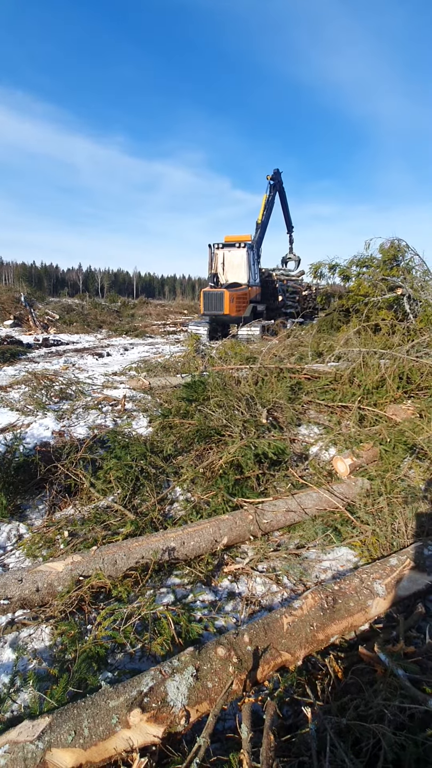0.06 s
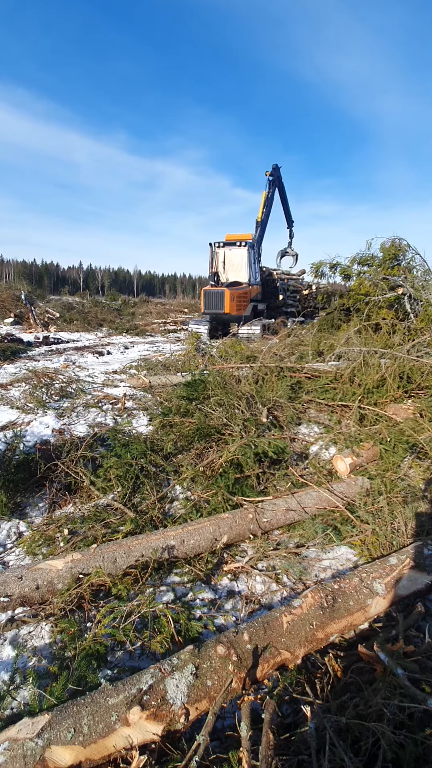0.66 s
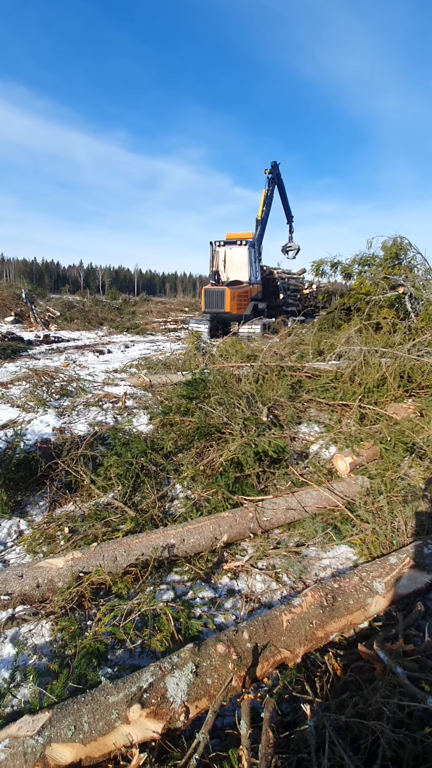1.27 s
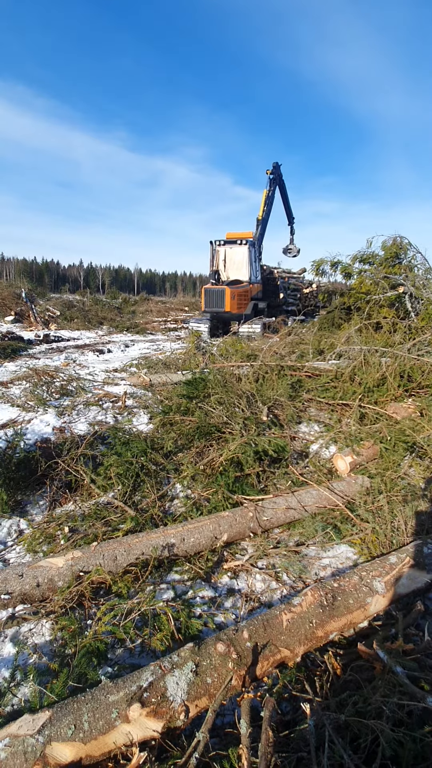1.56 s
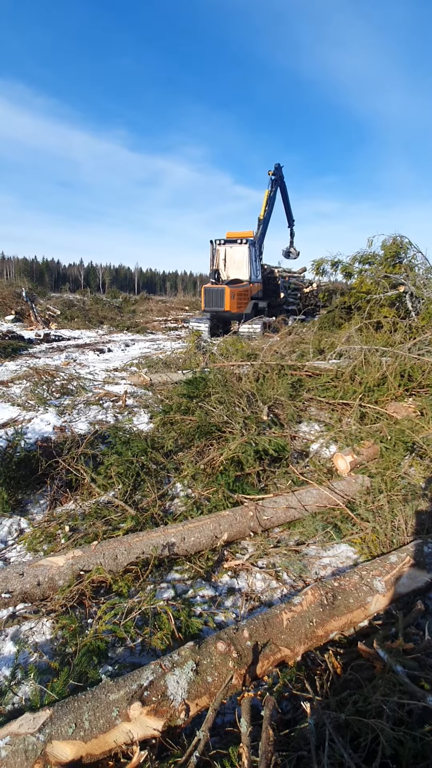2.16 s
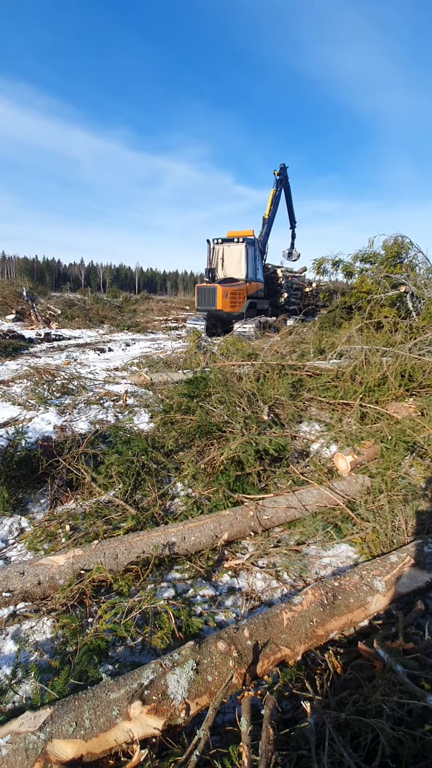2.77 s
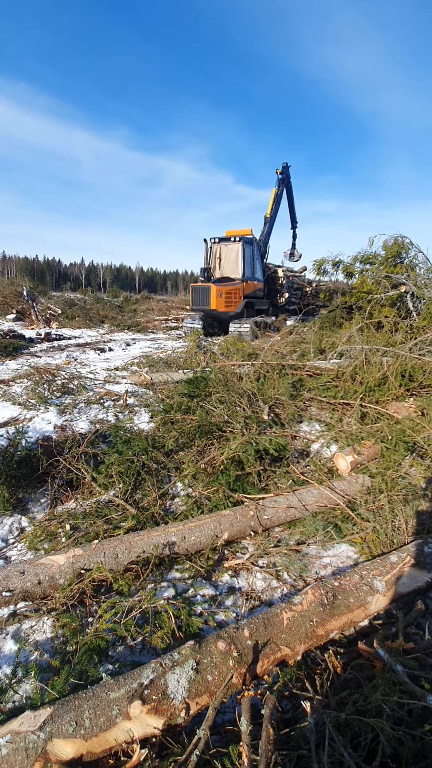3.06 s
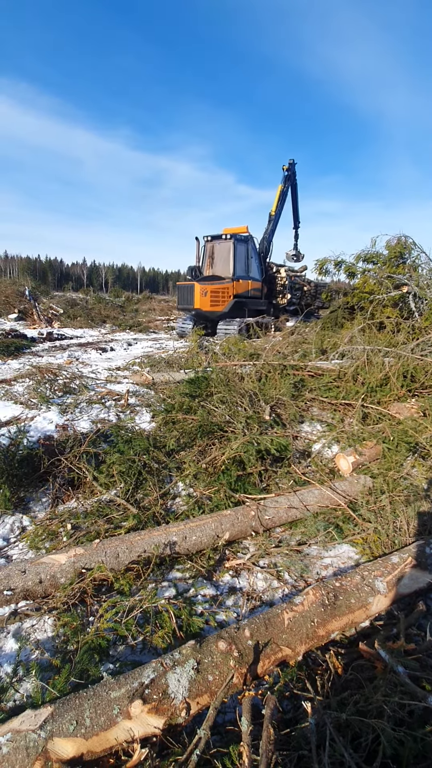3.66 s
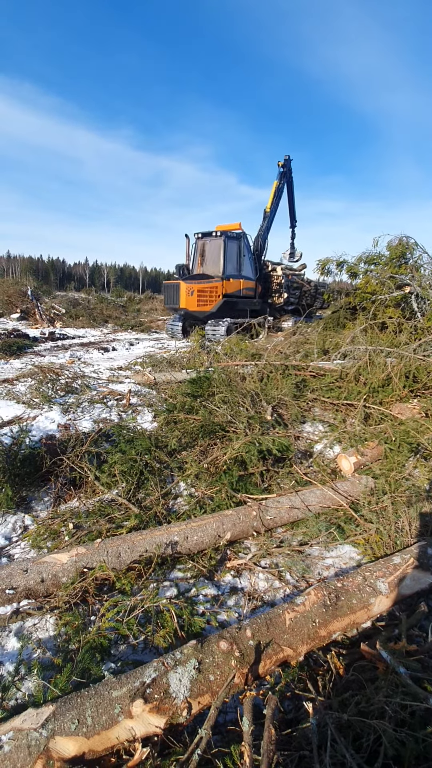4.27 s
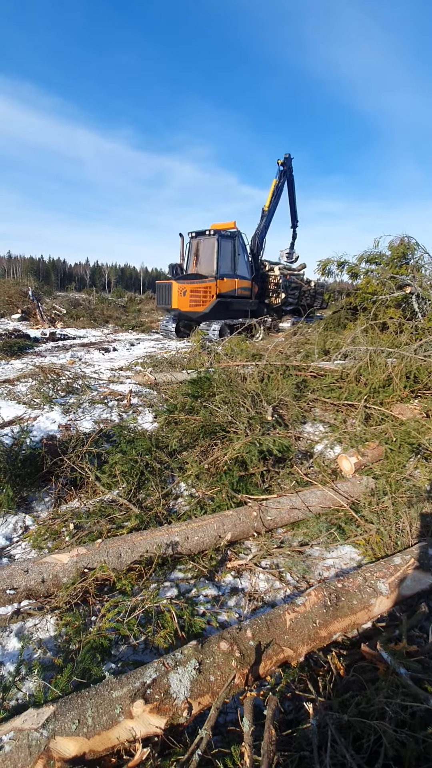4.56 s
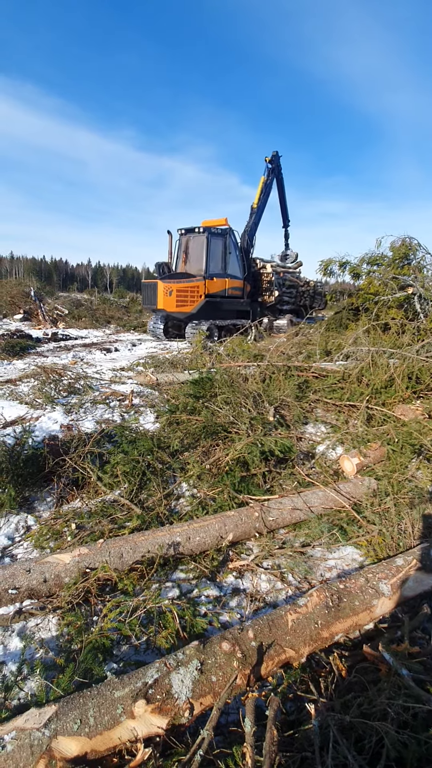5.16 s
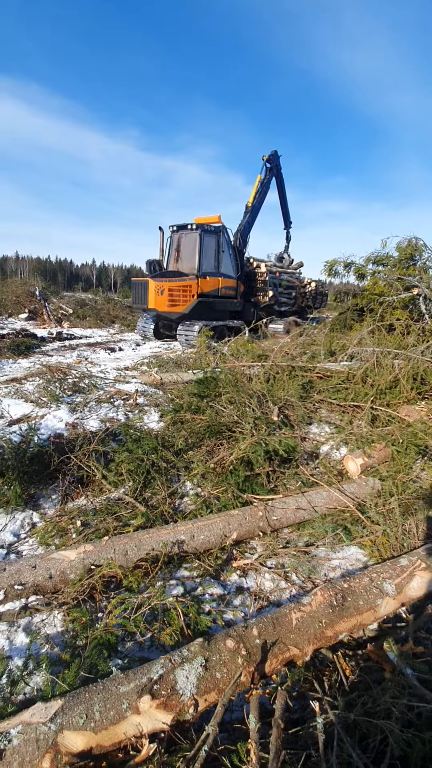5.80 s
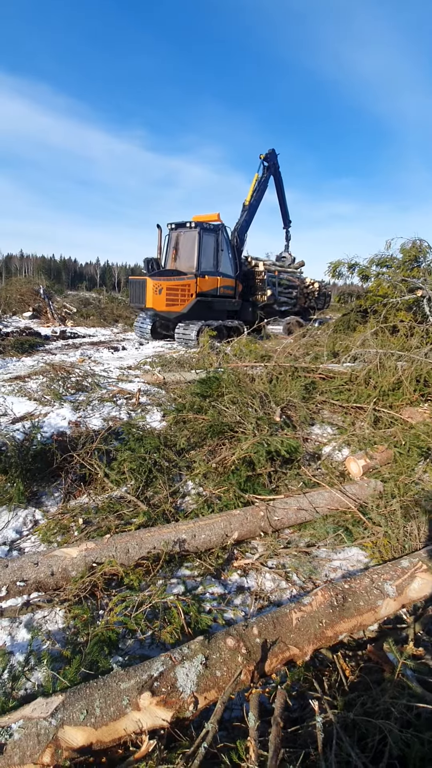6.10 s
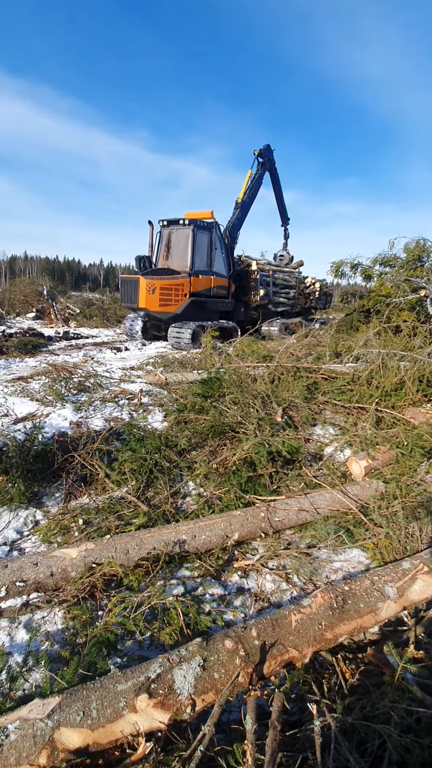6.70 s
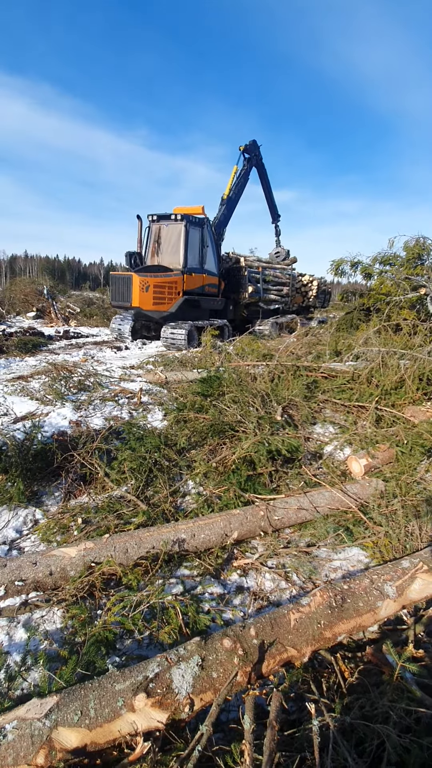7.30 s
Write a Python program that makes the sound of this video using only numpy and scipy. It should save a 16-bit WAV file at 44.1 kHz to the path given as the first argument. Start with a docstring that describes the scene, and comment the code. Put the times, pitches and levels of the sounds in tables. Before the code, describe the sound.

A tracked forestry machine's diesel surges, its steel grapple clacks shut, then it revs and drives closer over crackling twigs, tracks squeaking.

```python
"""A tracked forestry machine stands on a clear-cut, its four-cylinder diesel surging as it gets fuel.
Each firing booms and rasps in the exhaust, knocks the block and rattles the housing; a hydraulic pump
whines and the turbo whistles faintly. The crane's steel grapple clinks, then clacks shut at 1.6 s.
From 2.3 s the machine revs and drives closer over crackling twigs. After 5 s its turning tracks
scrape and squeak, and a brief squeal comes at the end."""
import sys
import numpy as np
from scipy import signal
from scipy.fft import rfft, irfft, next_fast_len
from scipy.io import wavfile
from scipy.ndimage import map_coordinates

SR = 44100
rng = np.random.default_rng(int(sys.argv[2]) if len(sys.argv) > 2 else 0)


def to_wav(sig):
    """Store sig (one row per channel, or 1-D mono) as 16-bit WAV at the path in sys.argv[1].

    Samples outside -1..1 are clipped; the rate is SR.
    """
    pcm = np.clip(np.atleast_2d(sig), -1, 1) * 32767
    pcm = np.round(pcm).astype(np.int16)
    wavfile.write(sys.argv[1], SR, pcm.T)  # frames by channels


N = 323694

# How strongly each of the four cylinders fires: level_db
CYLINDERS_DB = [-2.5, 0.5, -2, -5]
DRIVE_OFF_S, RISE_S = 2.316, 0.19  # when the tracks start; how long a pull takes to build up


def amp(db):
    """Turn decibels into a gain."""
    return 10 ** (np.asarray(db) / 20)


def unit(x):
    """Scale a signal to an average (rms) level of 1."""
    return x / np.sqrt(np.mean(x ** 2) + 1e-20)


def along(points, hz):
    """Read a (pitch_hz, value) table at hz, on a log frequency scale."""
    pitches, values = np.transpose(points)
    return np.interp(np.log(hz + 1), np.log(pitches + 1), values)


def curves(rows):
    """Turn each column after the time into one value per sample."""
    times, *columns = np.transpose(rows)
    return [np.interp(np.arange(N) / SR, times, column) for column in columns]


def wobble(rate):
    """A smooth random curve through `rate` points a second."""
    return map_coordinates(rng.standard_normal(int(N * rate / SR) + 4), [np.arange(N) * rate / SR])


def ramp(start_s, length_s):
    """A smooth step from 0 to 1."""
    return np.sin(np.pi / 2 * np.clip((np.arange(N) / SR - start_s) / length_s, 0, 1)) ** 2


def swell(centre_s, half_width_s):
    """A smooth bump of height 1."""
    return np.exp(-((np.arange(N) / SR - centre_s) / half_width_s) ** 2)


def wavering(hz, flutter_hz, rate):
    """The phase of a tone whose pitch wanders around hz."""
    return 2 * np.pi * np.cumsum(hz + flutter_hz * wobble(rate)) / SR


def filtered(x, response):
    """Filter x; response(hz) gives the gain and phase at each frequency."""
    size = next_fast_len(N + SR // 2)
    return irfft(rfft(x, size) * response(np.fft.rfftfreq(size, 1 / SR)), size)[..., :N]


def coloured(x, spectrum, ripple_db=0):
    """Shape x with a (pitch_hz, level_db) table, plus narrow random peaks and dips."""
    grid = np.arange(0, SR / 2, 110)
    ripple = rng.uniform(-1, 1, len(grid))
    peaks_db = lambda hz: ripple_db * np.interp(hz, grid, ripple) * hz / (hz + 1000)
    return filtered(x, lambda hz: amp(along(spectrum, hz) + peaks_db(hz)))


def resonate(x, centre_hz, width_hz):
    """Ring x through a steep resonance whose pitch moves."""
    carrier = np.exp(2j * np.pi * np.cumsum(centre_hz) / SR)
    shifted = x / carrier
    for width in (width_hz, 2 * width_hz):
        shifted = signal.lfilter([1], [1, -np.exp(-np.pi * width / SR)], shifted)
    return unit((shifted * carrier).real)


def spread(pair):
    """Mix two unrelated signals to left and right: alike in the bass, scattered in the treble."""
    # How alike the two sides are: pitch_hz, likeness
    likeness = [(200, 1), (600, .98), (1100, .86), (1700, .6), (2400, .45), (4400, .45), (9000, .3)]
    turn = lambda hz: np.arccos(np.clip(along(likeness, hz), -1, 1)) / 2
    mid, side = filtered(pair, lambda hz: np.array([np.cos(turn(hz)), np.sin(turn(hz))]))
    return np.array([mid + side, mid - side])


def bursts(firings, repeat, early, decay, between, scatter_db, uneven=1):
    """One noise burst per firing over steady noise (`between`); early and decay count in firings."""
    turns = firings + early + 1
    index, age = turns.astype(int), turns % 1
    cycle = rng.standard_normal((2, 3400))  # this noise repeats every four firings
    same = cycle[:, (turns / 4 % 1 * cycle.shape[1]).astype(int)]
    noise = np.sqrt(repeat) * same + np.sqrt(1 - repeat) * rng.standard_normal((2, N))
    cylinder_db = uneven * np.take(CYLINDERS_DB, index, mode="wrap")
    size = amp(cylinder_db + scatter_db * rng.standard_normal(SR)[index])
    return noise * (between + size * (1 - np.exp(-age / 0.11)) * np.exp(-age / decay))


def over_ground(x):
    """Sound bouncing off the ground cancels one band, which rises as the machine comes closer."""
    # The cancelled band: time_s, pitch_hz, depth_db, half_width_hz
    ground_dip = [(0, 241, -1.5, 30), (2.6, 254, 2.5, 43.4), (3.5, 322, 12, 64.6), (4.1, 354, 9, 35.2),
                  (6.2, 362, 10, 31.8), (7.34, 365, 5, 28)]
    hz, frame_s, spectra = signal.stft(x, SR, nperseg=4096)
    times, *columns = np.transpose(ground_dip)
    dip_hz, depth_db, half_width_hz = [np.interp(frame_s, times, column) for column in columns]
    gain = amp(-depth_db * np.exp(-((hz[:, None] - dip_hz) / half_width_hz) ** 2))
    return signal.istft(spectra * gain, SR, nperseg=4096)[1][:, :N]


def turbo():
    """A breathy whistle that swoops as the turbo spins up after each surge of fuel."""
    # The main whistle: time_s, pitch_hz
    glide = [(0, 10650), (.13, 10800), (.28, 12100), (.5, 12650), (.72, 11750), (1.1, 11250), (1.3, 11650),
             (1.45, 12650), (1.62, 12700), (1.82, 13700), (2.0, 12600), (2.15, 12000), (2.32, 11850),
             (2.7, 15000), (3.15, 17600), (3.65, 20200), (3.9, 18400), (4.3, 17200), (4.7, 16200),
             (7.34, 15200)]
    # Its tones: pitch_multiple, level_db, flutter_hz
    whistles = [(1, -67, 210), (.6, -68, 260)]
    # What escapes the air intake: pitch_hz, level_db
    intake = [(8400, -16), (9100, -5), (9800, -3), (10600, 0), (12600, 0), (13400, -5), (15000, -4)]
    pitch_hz, = curves(glide)
    tones = sum(amp(db) * np.sin(wavering(multiple * pitch_hz, flutter_hz, rate=900))
                for multiple, db, flutter_hz in whistles)
    return coloured(amp(2.5 * wobble(60) + wobble(6)) * tones, intake)


def twigs():
    """Crushed brushwood gives tiny snaps, in flurries and steadily under the moving tracks."""
    # Flurries of snaps: time_s, half_width_s, level_db
    flurries = [(.15, 0.1, -53), (1.35, .05, -58), (2.525, .012, -46), (2.63, 0.08, -49.5),
                (2.83, 0.067, -53), (3.14, .015, -48), (3.55, .15, -56)]
    snaps_per_s, fade_s = 190, 0.0028
    level = amp(-65) * ramp(DRIVE_OFF_S, RISE_S)
    level += sum(amp(db) * swell(s, width) for s, width, db in flurries)
    snaps = (rng.random(N) < snaps_per_s / SR) * amp(rng.uniform(-15, 8.9, N))
    grains = signal.lfilter([1], [1, -np.exp(-1 / (fade_s * SR))], snaps) * rng.standard_normal((2, N))
    return level * spread(unit(coloured(grains, [(800, -10), (2200, 6), (6000, 1), (15000, 3)])))


def track_scrape():
    """The turning steel tracks scrape a rough, wandering note, with short squeaks above it."""
    # The scraping note: time_s, pitch_hz, level_db
    scrape = [(5.3, 1190, -75), (5.53, 1238, -50), (5.66, 1385, -36), (5.79, 1230, -43), (6.0, 1578, -49),
              (6.6, 1623, -38), (6.9, 1610, -75)]
    # The squeaks: time_s, pitch_hz, level_db
    squeaks = [(5.665, 4750, -49), (5.72, 4060, -43), (5.77, 4600, -48), (5.80, 2470, -44),
               (5.88, 2570, -50), (5.935, 2920, -44)]
    pitch_hz, level_db = curves(scrape)
    angle = wavering(pitch_hz, flutter_hz=70, rate=400)
    note = np.sin(angle) + .25 * np.sin(2 * angle) + 0.1 * np.sin(3 * angle)
    out = amp(level_db + 2 * wobble(80)) * note
    for s, hz, db in squeaks:
        out += amp(db) * swell(s, half_width_s=.022) * np.sin(wavering(hz, flutter_hz=28, rate=300))
    return out


def squeal():
    """One brief, slightly shaky high note."""
    # The note: time_s, pitch_hz, level_db
    note = [(6.8, 1010, -70), (7.05, 1000, -38), (7.15, 1008, -28), (7.22, 1021, -26), (7.34, 997, -55)]
    pitch_hz, level_db = curves(note)
    return amp(level_db + 2.03 * wobble(30)) * np.sin(wavering(pitch_hz, flutter_hz=10, rate=60))


def pump(firings):
    """The hydraulic pump is geared to the crank, so its whine throbs with the uneven turning."""
    # How loud it whines: time_s, level_db
    levels = [(0, -36), (2.4, -58), (3.55, -43), (3.92, -32.5), (4.2, -46), (5.3, -37), (6.2, -31.5),
              (7.34, -35)]
    level_db, = curves(levels)
    strokes = 2 * np.pi * 13.5 * firings + .45 * wobble(25)
    throb = 1 + .4 * np.cos(np.pi * firings)
    return amp(level_db + 2.5 * wobble(25)) * throb * np.sin(strokes)


def grapple():
    """Steel jaws meet and bounce: each contact is a hard tick, a gritty rattle and a ring."""
    # Contacts (a fade is a 60 dB drop): start_s, grit_db, fade_s, ring_db, brightness_db_per_octave
    contacts = [(.407, -31, .11, -45, 1), (.442, -32, .11, -42, 5), (.555, -42, .06, -49, 5.5),
                (1.5525, -12.5, .05, -25, 0), (1.559, -17, .05, -18.5, -1),
                (1.5735, -16, 0.055, -19.5, -1.5), (1.578, -23, 0.082, -28, 1.5),
                (1.587, -24, 0.035, -32, 5.5), (1.5935, -29, .05, -17.5, -7)]
    # The notes the jaws ring with: pitch_hz, level_db, fade_s
    jaw_notes = [(525, -6, .07), (638, 0, .07), (673, -1, .11), (830, -3, .05), (1057, -2, .08),
                 (1475, -6, .07), (1930, -7, .045), (2056, -10, .06), (2406, -12, .055), (3000, -15, .07),
                 (3989, -11, .05), (4940, -11.5, .055), (7047, -21, .05)]
    # The colour of the grit: pitch_hz, level_db
    grit_colour = [(250, -41), (500, 9), (900, -2.5), (2200, -2), (3500, -8.5), (6000, -16.5), (9500, -19),
                   (15000, -31)]
    tick_db, tick_fade_s = -6, 0.0096  # the tick's level is relative to the grit
    t = np.arange(SR // 4) / SR
    grit, rings = np.zeros(N), np.zeros(N)
    for start_s, grit_db, fade_s, ring_db, brightness in contacts:
        start = round(start_s * SR)
        span = slice(start, start + len(t))
        grit[span] += amp(grit_db - 60 * t / fade_s) + amp(grit_db + tick_db - 60 * t / tick_fade_s)
        for hz, db, ring_s in jaw_notes:
            note_db = ring_db + db + brightness * np.log2(hz / jaw_notes[0][0]) + rng.normal(0, 1)
            rings[span] += amp(note_db - 60 * t / ring_s) * np.sin(2 * np.pi * hz * t)
    rings = filtered(rings, lambda hz: hz ** 4 / (hz ** 4 + 430 ** 4))  # narrow jaws give little bass
    grain = rng.standard_normal((2, N)) * amp(2.5 * wobble(900))
    return spread(grit * unit(coloured(grain, grit_colour, ripple_db=4))) + rings


def governor():
    """The engine's fuel supply, as a share of full load: idle, travel, surges and brief cuts."""
    # More fuel when crane or tracks pull: start_s, length_s, extra_share
    surges = [(-.08, 0.31, 0.51), (0.243, 0.24, 0.41), (1.075, 0.63, 0.22), (1.161, 0.23, 0.29),
              (1.602, 0.18, 0.41), (2.187, 1.4, 0.4), (2.847, 0.43, 0.11), (3.9, 1.27, 0.073),
              (5.996, 0.42, 0.092), (6.734, 0.37, 0.14)]
    # Less fuel after the engine runs too fast: time_s, share_cut
    cuts = [(.66, 0.9), (1.945, 0.99), (3.85, 0.19)]
    idle, travel, fall_s = 0.26, 0.34, 0.16
    fuel = idle + travel * ramp(DRIVE_OFF_S, RISE_S)
    for start_s, length_s, extra in surges:
        fuel += extra * ramp(start_s, RISE_S) * (1 - ramp(start_s + length_s, fall_s))
    for s, share in cuts:
        fuel *= 1 - share * swell(s, half_width_s=0.066)
    return fuel


def block_knock(firings, load_db):
    """A short, hard burst at each firing rings the engine block, much louder under load."""
    # The block's resonances: pitch_hz, width_hz, level_db
    notes = [(830, 76, 2), (1650, 170, 0), (2000, 150, 5), (2200, 110, -1), (2820, 70, -8),
             (3300, 100, -4.5), (3900, 160, -6.5), (4930, 140, -16.5)]
    def block(hz):
        return sum((-1) ** k * amp(db) * 1j * hz * width / (centre ** 2 - hz ** 2 + 1j * hz * width)
                   for k, (centre, width, db) in enumerate(notes))
    blows = bursts(firings, repeat=0.41, early=-.04, decay=0.08, between=0.08, scatter_db=5)
    return spread(amp(-41.5 + 1.9 * load_db) * unit(filtered(blows, block)))


def housing(firings, load_db):
    """The firings rattle the panels, hardest under load, over the rush of cooling air."""
    # The rattle's colour from three sides of the machine: pitch_hz, level_db
    standing = [(110, 18), (260, 14.5), (400, 16.5), (600, 14), (820, 16), (930, 12), (1080, 15.5),
                (1250, 8.5), (1510, 8), (1640, 9.5), (1810, 1.5), (1920, 2), (2020, 1), (2170, -2),
                (2280, 2.5), (2670, 1), (2910, -5), (3230, 0), (3380, -5.5), (4110, -4.5), (4350, -8),
                (4930, -11.5), (5080, -11), (5230, -12), (5530, -14.5), (6890, -18), (7400, -45)]
    driving = [(250, -13), (350, 8), (820, 8), (1050, 9), (1250, 5), (1400, 3.5), (1530, 2), (1640, 8.5),
               (1770, 4.5), (2300, -3.5), (2650, -6.5), (2840, -8), (3170, -5), (3380, -2.5), (3640, -10),
               (4050, -3), (4390, -15.5), (4650, -5.5), (4930, -14.5), (5100, -12), (6270, -17.5),
               (6610, -23), (6890, -17.5), (7400, -32)]
    nearing = [(230, 9.5), (300, 15.5), (355, 0), (820, 2), (1150, 7.5), (1330, -3), (1640, 7),
               (1830, -1.5), (2000, 4.5), (2220, 3.5), (2440, -8.5), (2830, 2), (3060, -9), (3420, -1.5),
               (3770, -8.5), (4330, -2.5), (4870, -11), (5790, -13.5), (6140, -19), (6890, -17.5),
               (7400, -25.5)]
    # Which side is heard as it turns: time_s, standing_share, driving_share, nearing_share
    facing = [(2.2, 0.57, 0.011, 0), (3.0, 0.05, 0.44, 0), (5.1, 0.0042, 0.49, 0.016),
              (5.9, 0.022, 0.067, 0.23), (6.55, 0.026, 0.025, 0.23), (7.0, 0, 0.012, 0.6)]
    # The colour of the rushing air: pitch_hz, level_db
    hiss = [(4000, -24), (6000, -14), (7300, 2), (9000, 7), (11000, 2), (13000, -9), (15500, -21)]
    hardness = np.clip(amp(1.7 * (load_db - 1)), 0, 1)
    steady = bursts(firings, repeat=.35, early=0, decay=.25, between=4, scatter_db=2)
    pulse_db = 3.5 * np.cos(2 * np.pi * (firings - .19)) + 1.8 * wobble(70)
    pulse = amp(hardness * pulse_db)
    rattle = unit(steady * pulse)
    clatter = sum(np.sqrt(np.abs(share)) * coloured(rattle, side, ripple_db=4.5)
                  for share, side in zip(curves(facing), (standing, driving, nearing)))
    air = unit(coloured(rng.standard_normal((2, N)) * pulse, hiss, ripple_db=2))
    return spread(amp(-30 + 0.045 * load_db) * clatter + amp(-59.5 + 0.33 * load_db) * air)


def valve_kicks(firings, early, jitter, uneven):
    """One slightly unsteady click as each exhaust valve opens."""
    index = np.floor(firings + early + jitter * wobble(50)).astype(int)
    strength = amp(uneven * np.take(CYLINDERS_DB, index, mode="wrap"))
    return unit(np.diff(index, prepend=index[0]) * strength)


def exhaust_rasp(firings, load_db):
    """Each valve's kick and gas burst ring the silencer; with little load the flow is more even."""
    # The silencer's low, middle and high resonance: width_hz, db_per_load_db, cylinder_unevenness
    silencer = [(128, 0.68, 1.04), (124, 0.36, 1.4), (131, 0.47, 2.8)]
    # How they drift: time_s, low_hz, middle_hz, high_hz
    pitches = [(2.7, 470, 679, 1085), (3.1, 508, 682, 1035), (3.6, 499, 580, 1014), (4.3, 506, 595, 1010),
               (5.2, 523, 632, 1004), (6.0, 505, 651, 988), (7.34, 490, 640, 957)]
    # Their levels as the machine turns: time_s, low_db, middle_db, high_db
    levels = [(0, -29.5, -32, -46), (2.7, -30, -34, -39.5), (3.0, -26, -30, -39), (3.5, -22, -42, -40),
              (4.0, -24, -31, -38.5), (5.1, -26.5, -26.5, -39.5), (5.4, -32.5, -28, -47),
              (5.7, -29.5, -30.5, -38.5), (6.1, -29.5, -31, -33), (6.7, -27.5, -32.5, -32.5),
              (7.15, -26, -36, -29)]
    load = np.clip(amp(0.33 * (load_db + 3.5)), 0, 1)
    out = 0
    for (width, follows, uneven), centre, level_db in zip(silencer, curves(pitches), curves(levels)):
        kick = .8 * load * valve_kicks(firings, early=.19, jitter=.008, uneven=uneven)
        gas = bursts(firings, repeat=.6, early=.28, decay=.18, between=.11, scatter_db=.8, uneven=uneven)
        flow = load * unit(gas) + np.sqrt(1 - load ** 2) * rng.standard_normal((2, N))
        flow[0] += kick  # spread() puts this row in the middle
        out = out + amp(level_db + follows * load_db) * resonate(flow, centre, width)
    low_cut = signal.butter(4, 340, "high", fs=SR, output="sos")
    return spread(signal.sosfilt(low_cut, out))


def exhaust_boom(firings, firing_hz, fuel, load_db):
    """Pressure pulses leave the pipe as a deep note, fuller under load, with puffs and rumble."""
    # The upper harmonics: firing_rate_multiple, level_db
    overtones = [(3, 1), (4, -5), (5, -15), (6, -20)]
    # The colour of the puffs: pitch_hz, level_db
    chuff = [(60, -24), (130, 4), (240, -12), (300, 2.5), (360, -4), (500, -43), (900, -54)]
    angle = 2 * np.pi * (firings + .005 * wobble(45))
    # Harmonic round(k); the open pipe shifts the lowest ones earliest.
    harmonic = lambda k: -np.sqrt(2) * np.cos(round(k) * angle + np.pi / 2 / k)
    rev_hz = firing_hz - 54.3  # distance from a fast-revving rate; higher revs thin the deepest boom
    cylinder_db = 0.21 * np.interp(firings, np.arange(4), CYLINDERS_DB - np.mean(CYLINDERS_DB), period=4)
    # At the balance, burning fuel just cancels the pistons' suction; below it the push flips over.
    height, balance = np.abs(fuel) ** 0.67, 0.27 ** 0.67
    push = (height + 0.0058 * wobble(17) - balance) / (1 - balance)
    pumping = amp(-39.5 + 1.5 * wobble(22)) * np.sqrt(2) * np.sin(angle + 1.3)  # pistons moving air
    first = amp(-19.5 - 0.14 * rev_hz) * push * harmonic(1) + pumping
    second = amp(-21 + 0.24 * rev_hz + cylinder_db / 2 + 0.21 * wobble(25)) * height * harmonic(2.4)
    upper_db = -22.5 + 0.03 * rev_hz + load_db + cylinder_db + 0.21 * wobble(40)
    upper = sum(amp(upper_db + db) * harmonic(k) for k, db in overtones)
    puffs = bursts(firings, repeat=0.52, early=0.13, decay=0.22, between=1.0, scatter_db=-4)
    rumble_colour = [(32, -40), (58, 1), (85, -3.0), (180, -2.0), (300, -4), (600, -43)]
    rumble = unit(coloured(rng.standard_normal((2, N)), rumble_colour))
    strength = amp(.5 * wobble(50))  # no two firings are equally strong
    breath = amp(load_db - 32.5) * unit(coloured(puffs, chuff)) + amp(-35.5) * rumble
    return first + strength * (second + upper) + spread(breath)


def scene():
    """Speed and fuel drive the engine; the left side runs ahead of the right by an amount that changes with
    pitch."""
    # Engine speed: time_s, firings_per_s
    speed = [(0.0, 49.31), (0.12, 46.3), (0.25, 49.5), (0.4, 49.61), (0.55, 52.55), (1.05, 51.07),
             (1.28, 47.24), (1.52, 51.7), (1.68, 47.03), (1.85, 53.65), (2.15, 51.55), (2.43, 43.91),
             (2.85, 48.49), (3.17, 53.4), (3.65, 57.71), (4.05, 52.79), (4.6, 51.35), (5.25, 52.37),
             (6.15, 50.71), (6.6, 51.34), (7.0, 50.16), (7.34, 51.28)]
    # How far the left side is ahead of the right: pitch_hz, lead_radians
    left_lead = [(20, 0), (120, .15), (300, .45), (700, .65), (1000, 1.6), (1300, 1.7), (1900, 3.2),
                 (2200, 5.1), (2500, 7.6), (2850, 7.7), (3200, 9.8), (4300, 10.5), (6000, 12.3),
                 (15000, 22)]
    firing_hz, = curves(speed)
    firings = 1 / 4 + np.cumsum(firing_hz) / SR  # a running count
    firings += .006 * (np.cos(np.pi * firings) + np.sin(np.pi / 2 * firings) / 2)  # uneven crank
    fuel = governor()
    load_db = 29 * np.log10(np.hypot(fuel, 0.21))  # even without fuel the pistons pump air
    approach_db_per_s = 0.37
    nearer = amp(approach_db_per_s * np.maximum(np.arange(N) / SR - DRIVE_OFF_S, 0))
    exhaust = exhaust_boom(firings, firing_hz, fuel, load_db) + exhaust_rasp(firings, load_db)
    engine = exhaust + housing(firings, load_db) + block_knock(firings, load_db) + turbo()
    mix = nearer * over_ground(engine) + pump(firings) + squeal() + track_scrape() + grapple() + twigs()
    sides = np.array([[1], [-1]])
    return filtered(mix, lambda hz: np.exp(sides * .5j * along(left_lead, hz)))


def record(dry):
    """Left and right each get their own colour; the deepest bass and highest treble are cut."""
    # How much louder the left is than the right: pitch_hz, level_db
    lean = [(60, -2), (110, -2.5), (200, -5), (380, -1), (1290, -3), (2380, -3), (4400, 1.5), (6200, 6.5),
            (8000, 20), (9500, 20), (11000, 8), (15000, 7)]
    low_cut_hz, top_hz = 33, 15800
    def response(hz):
        gains = amp(np.array([[.5], [-.5]]) * along(lean, hz))
        band = (1 - 1 / (1 + (hz / low_cut_hz) ** 10)) * (hz < top_hz)
        return band * gains / np.sqrt(np.mean(gains ** 2, axis=0))
    return filtered(dry, response)


dry = scene()
out = record(dry)
to_wav(out)
```